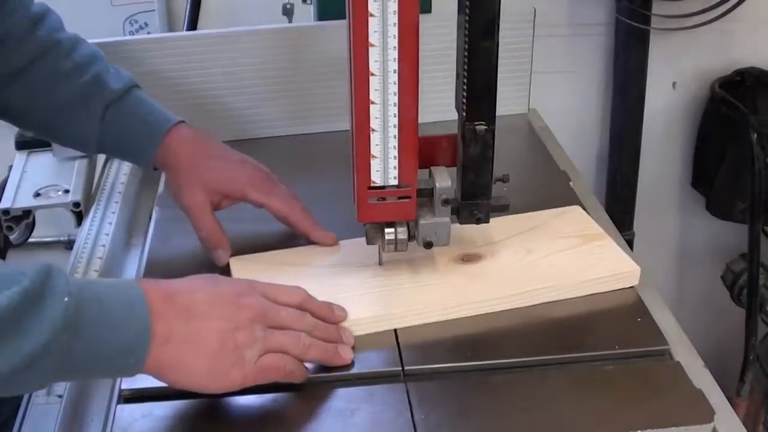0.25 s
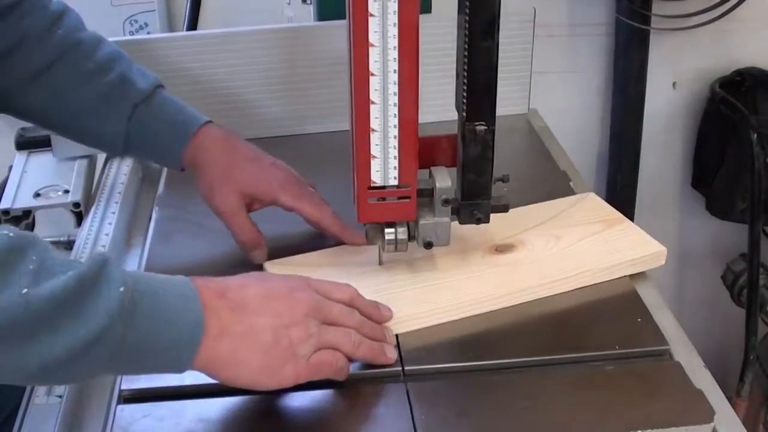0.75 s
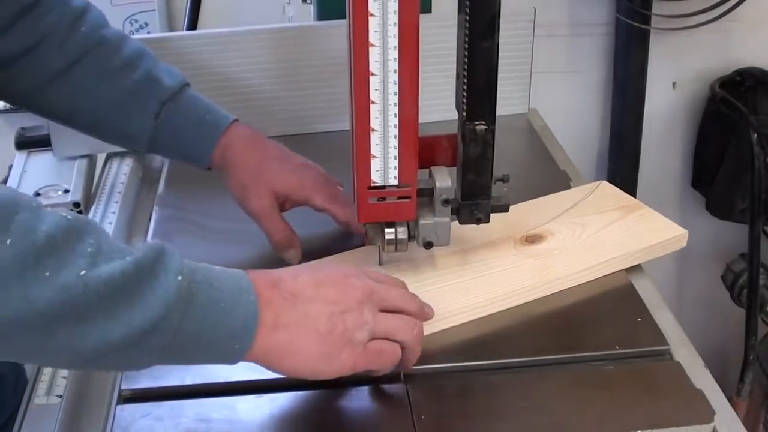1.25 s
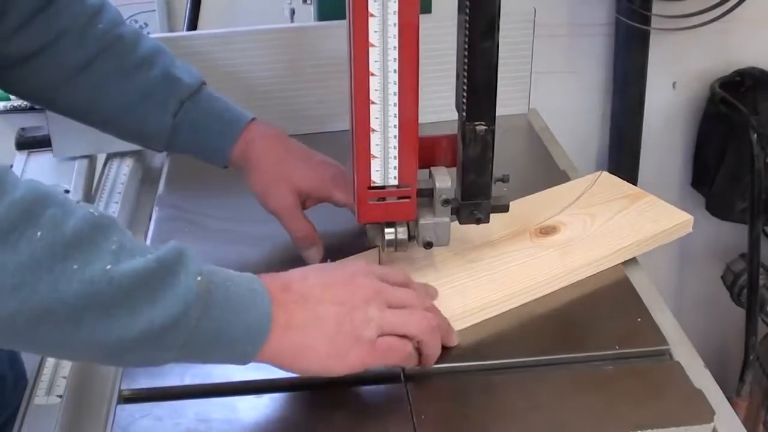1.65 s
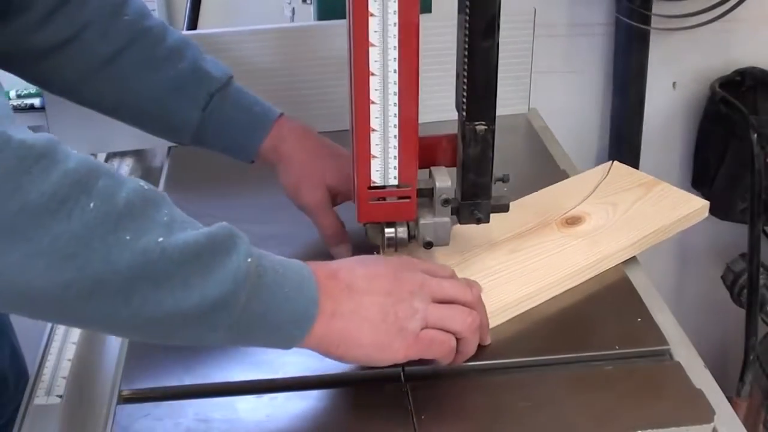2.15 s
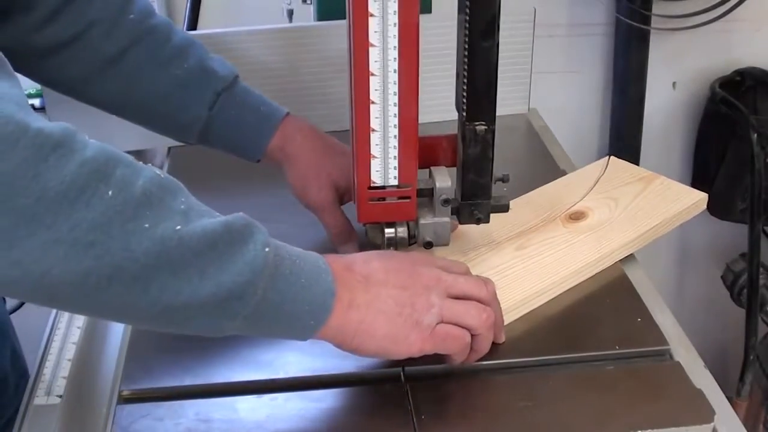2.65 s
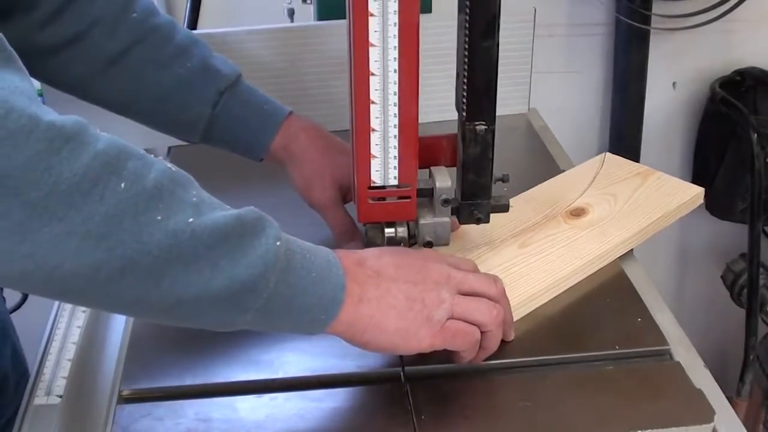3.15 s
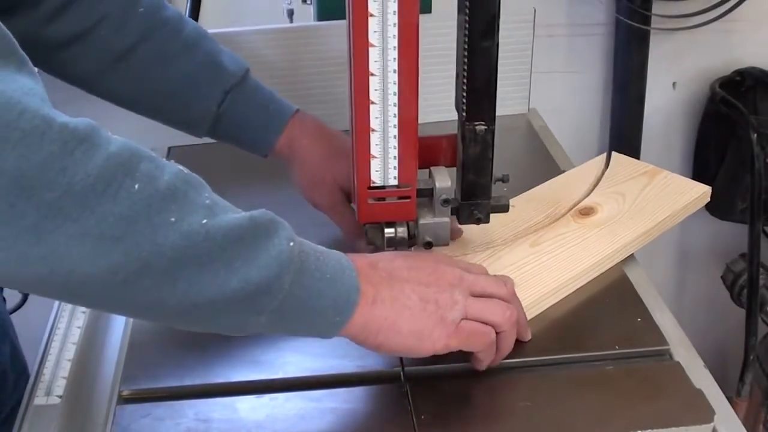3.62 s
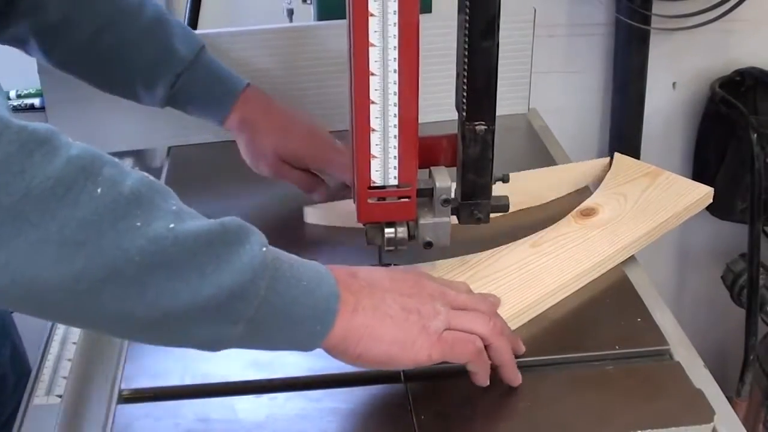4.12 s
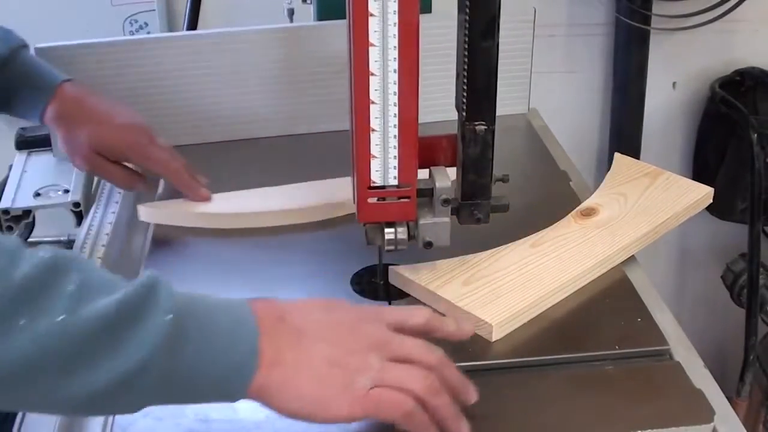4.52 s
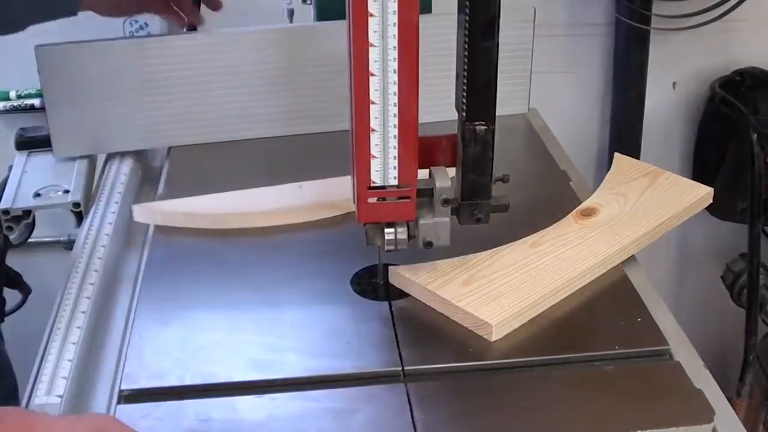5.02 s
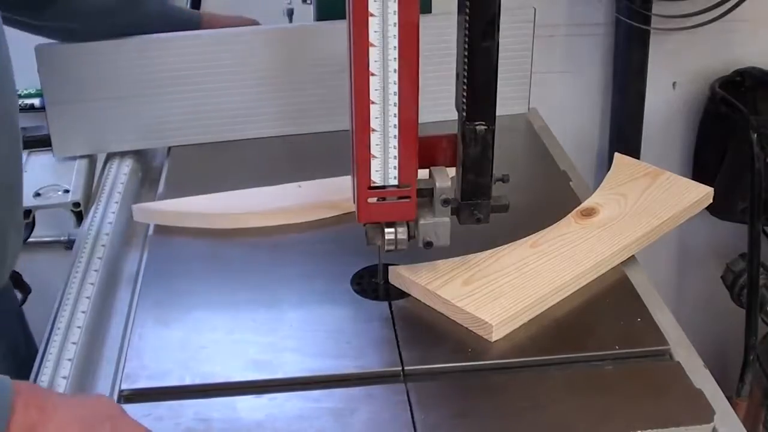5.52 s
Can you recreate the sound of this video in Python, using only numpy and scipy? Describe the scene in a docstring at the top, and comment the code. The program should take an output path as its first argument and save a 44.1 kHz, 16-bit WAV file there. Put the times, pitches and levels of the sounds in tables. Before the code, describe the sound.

Bandsaw cutting a pine board: fast thin whine, sudden change to harsh hissing rasp, then deeper free-running hum and a switch-off clunk.

```python
"""A bandsaw cuts a curve through a pine board in a workshop: motor partials over bands of resonant noise.
The first 2.3 s race by at about five times speed, so the motor's hum is a whine; then, at normal pace, the
teeth rasp through the last of the wood and the blade runs free. Narrow noise bands sing, a frame panel rings
in rough tones and short bursts scuff. Near the end the motor is switched off with a clunk of decaying modes:
its hum starts to die while the blade coasts on, still hissing. Dense reflections spread the sound a little."""
import sys
import numpy as np
from scipy import signal
from scipy.fft import rfft, irfft, next_fast_len
from scipy.io import wavfile

SR = 44100
rng = np.random.default_rng(int(sys.argv[2]) if len(sys.argv) > 2 else 0)


def bounce(signal):
    """Save signal as a 16-bit WAV file at the path given by the first command-line argument."""
    frames = np.transpose(np.atleast_2d(signal))
    limited = np.clip(frames, -1, 1)
    pcm = np.round(limited * 32767).astype(np.int16)
    wavfile.write(sys.argv[1], SR, pcm)


N = 254451
TIME = np.arange(N) / SR
BINS = np.maximum(np.arange(N // 2 + 1) * SR / N, 1)   # spectrum frequencies in Hz, never zero

# Motor partials, racing and at normal pace; level relative to the motor's: multiple of the pull, level_db
FAST_MOTOR_PARTIALS = [(1, -26), (2, -19.5), (3, -21), (4, 1), (5, -1.5), (6, -25.5), (8, -18)]
MOTOR_PARTIALS = [(1, -24), (2, -24), (3, -23), (4, 1.9), (5, -0.5), (6, -31.5), (8, -18.5), (9, -23.5)]
# Broad spectra; their noise is scaled to unit rms, so levels are relative: frequency_hz, level_db
FAST_SAW_SPECTRUM = [(30, -88.6), (150, -89.5), (400, -87.2), (650, -80), (950, -80.5), (1900, -69.5),
                     (3000, -75), (4200, -79), (6300, -81.5), (9500, -70), (11000, -76), (13000, -70.5),
                     (15600, -80)]
FRAME_SPECTRUM = [(25, -84), (90, -78.5), (200, -74), (260, -65.5), (400, -62), (600, -54.5), (800, -63),
                  (900, -62)]
CUTTING_SPECTRUM = [(850, -63.5), (1300, -61), (2300, -60.5), (4500, -59), (6000, -65.5), (7500, -58.5),
                    (10000, -61.5), (11000, -69.5), (13300, -69), (14000, -77), (15600, -77)]
FREE_BLADE_SPECTRUM = [(850, -61), (1900, -63.5), (2600, -66), (3800, -66.5), (4900, -57), (6100, -64.5),
                       (7200, -61), (8800, -57), (10500, -62), (11200, -68.5), (13200, -72.5), (14000, -73),
                       (15600, -86)]
SHUDDER_SPECTRUM = [(40, -36), (100, -19), (200, -3), (600, 2), (900, -12.5), (1900, -15), (3000, -18),
                    (8000, -34)]
# Resonances standing on those spectra, width at half gain: centre_hz, width_hz, level_db (relative)
FAST_SAW_RESONANCES = [(729, 57, -68), (1175, 37, -56), (1602, 148, -59), (2497, 140, -60),
                       (3276, 320, -60), (5056, 116, -69), (7530, 130, -68.5), (8870, 220, -64),
                       (9980, 620, -65.5), (15840, 900, -68)]
FRAME_RESONANCES = [(152, 30, -62.5), (245.2, 21.4, -51.5), (270, 6.1, -48), (295, 5.1, -47.5),
                    (303, 52, -53.5), (501.7, 26, -44.5), (617.7, 8.5, -46.5), (666.5, 2.3, -41.5)]
CUTTING_RESONANCES = [(1363, 22, -51), (1810, 140, -55.5), (2015, 80, -49), (2255, 80, -50),
                      (2530, 250, -52.5), (2727, 34, -48), (3410, 40, -45.5), (5455, 44, -49),
                      (6550, 280, -57), (6822, 50, -52), (10214, 80, -55), (13630, 120, -65)]
FREE_BLADE_RESONANCES = [(1770, 180, -59.5), (2015, 31, -53), (2460, 46, -61.5), (3270, 350, -60.5),
                         (3635, 13, -53.5), (5500, 17, -48.5), (6990, 320, -58), (12020, 130, -57),
                         (12700, 900, -64)]
# The blade sings in the kerf or on its guides: start_s, end_s, start_hz, end_hz, width_hz, level_db
SINGING_GLIDES = [(-.1, 0.929, 9400, 8590, 795, -27.5), (.58, 1.008, 15200, 15200, 500, -31),
                  (.8, 1.298, 13950, 13060, 1500, -26.5), (1.234, 1.562, 13360, 12800, 970, -23),
                  (1.615, 1.8, 12900, 12600, 800, -30), (1.95, 2.36, 12850, 12100, 1800, -28.5),
                  (1.975, 2.333, 7700, 6800, 800, -30), (2.465, 2.58, 6850, 6830, 110, -27),
                  (2.816, 3.381, 6720, 6600, 200, -28), (3.6, 4.506, 8300, 8500, 600, -27.5)]
# Teeth catch in hard grain or wood slides over the table: start_s, end_s, centre_hz, width_hz, level_db
SCUFF_BURSTS = [(0.143, 0.25, 9000, 2800, -23), (0.668, 0.697, 9200, 1390, -22),
                (1.36, 1.762, 5100, 600, -37), (2.872, 2.91, 1440, 700, -23),
                (3.052, 3.294, 2750, 600, -27), (4.052, 4.21, 1710, 600, -27.5),
                (4.175, 4.44, 1800, 900, -30)]
# A panel of the frame rings: start_s, end_s, pitch_hz, level_db
PANEL_TONES = [(.2, 0.573, 2553, -27.5), (1.52, 1.775, 2508, -24.5)]
# Low modes of the cabinet, struck by the switch: frequency_hz, level_db, t60_s
CABINET_RINGING = [(146.6, -19, 0.47), (265.7, -20, .45), (577, -15.5, 0.44)]
# Reflections, side against mid; frequencies at normal pace: frequency_hz, level_db
SIDE_SPECTRUM = [(60, -36), (130, -22), (290, -40), (640, -28), (1410, -22.5), (2600, -18.5), (5000, -16.5),
                 (8000, -26), (15000, -76)]
# How hard the board is fed through the curve: time_s, feed (0 to 1)
FEED_CURVE = [(0, 0.26), (.5, 0), (1.55, 1), (2.28, 0.86)]

# Moments in s: normal pace begins, the teeth leave the wood, the motor is switched off
NORMAL_PACE_S, EXIT_S, EXIT_LENGTH_S, SWITCH_S = 2.297, 3.41, 0.11, 5.604
FAST_SPEED, NORMAL_SPEED = 4.973, 1
# Rates at normal pace: the magnetic pull, turns of the guide bearing, turns of the blade loop
PULL_HZ, GUIDE_HZ, BLADE_LOOP_HZ = 119.93, 77.7, 2.4

# Parts of the racing saw: (dB at the lightest feed, dB gained at full feed)
FAST_WHINE = (-28.4, 5.85)
FAST_FRAME = (-39, 5.14)
FAST_PANELS = (-32, 4.1)
FAST_RASP = (-38, 4.7)
FAST_HISS = (-27.5, 0.93)
# As the curve tightens the blade rubs the side of the kerf ever harder
BIND_S, BIND_RASP_DB_PER_S, BIND_HISS_DB_PER_S = 1.03, 5, 2.6

# At normal pace, in the wood and running free
HUM_CUTTING_DB, HUM_FREE_DB = -25.5, -20.5
RASP_CUTTING_DB, RASP_FREE_DB = -20, -29
HISS_CUTTING_DB, HISS_FREE_DB = -18, -19.5   # free hiss as the teeth leave the wood
FRAME_CUTTING_DB, FRAME_FREE_DB = -27.5, -26
CLEARING_DB_PER_S = 0.82   # the free blade hisses more as the wood is drawn away from it
HUM_T60_S = .55            # decay of hum and rumble once the current is cut

PANEL_OCTAVE_DB = -16      # second partial against the first
DRONE_S, DRONE_HZ, DRONE_WIDTH_HZ, DRONE_DB = 5.2, 261, 10, -30
SHUDDER_DB, SHUDDER_T60_S = -16, 1.2
REBOUND_S, REBOUND_DB = .102, -6.5   # the cabinet rattles once more, after this delay
SHOP_T60_S = 0.05          # at normal pace
CUTOFF_HZ = 15700


def from_db(db):
    """Amplitude gain is ten to the power of decibels over twenty."""
    return 10 ** (np.asarray(db) / 20)


def rms_one(x):
    """Normalisation divides a signal by the root of its mean power."""
    return x / np.sqrt(np.mean(x ** 2) + 1e-20)


def noise(gain):
    """Filtering white noise by a gain over frequency gives steady coloured noise, here of rms 1."""
    size = next_fast_len(N, real=True)
    shape = np.interp(np.arange(size // 2 + 1) * SR / size, BINS, gain)
    white = rfft(rng.standard_normal(size))
    return rms_one(irfft(white * shape, size)[:N])


def drift(rate_hz):
    """Low-passed noise is a slow random fluctuation, here of rms 1."""
    return noise(1 / (1 + (BINS / rate_hz) ** 2))


def peak(centre_hz, width_hz):
    """A resonance responds most at its centre and with half the gain at the edges of its width."""
    return 1 / (1 + (2 * (BINS - centre_hz) / width_hz) ** 2)


def body(spectrum, resonances=(), ripple=1):
    """Powers add: resonances stand on a broad, possibly rippled spectrum; returns gain."""
    hz, db = np.transpose(spectrum)
    broad_db = np.interp(np.log(BINS), np.log(hz), db)
    power = (ripple * from_db(broad_db)) ** 2
    for centre_hz, width_hz, peak_db in resonances:
        power = power + (from_db(peak_db) * peak(centre_hz, width_hz)) ** 2
    return np.sqrt(power)


def band(low_hz, high_hz, order=16):
    """A high-pass and a low-pass skirt together form a steep band-pass gain."""
    return ((1 + (low_hz / BINS) ** order) * (1 + (BINS / high_hz) ** order)) ** -.5


def fine_modes(spacing_hz, ripple_db):
    """Modal overlap: many modes of blade, table and guards ripple the response, less so in the treble."""
    grid = np.arange(0, SR / 2, spacing_hz)
    heights = np.clip(rng.standard_normal(len(grid)), -2, 2)
    ripple = np.interp(BINS, grid, heights)
    return from_db(ripple_db * ripple / (1 + BINS / SR * 2))


def swell(start, end):
    """A half-sine power envelope rises and falls roundly between two times."""
    progress = np.clip((TIME - start) / (end - start), 0, 1)
    return np.sqrt(np.abs(np.sin(np.pi * progress)))


def dying(start, t60):
    """Damping is exponential decay: 1 until start, then 60 dB lost per t60."""
    return from_db(-60 * np.maximum(TIME - start, 0) / t60)


def resonance(start, end, start_hz, end_hz, width_hz, db):
    """An unevenly driven resonance is a carrier with random quadrature amplitudes; it swells and may glide."""
    pitch_hz = np.interp(TIME, [start, end], [start_hz, end_hz])
    phase = 2 * np.pi * np.cumsum(pitch_hz) / SR
    ringing = drift(width_hz / 2) * np.cos(phase) + drift(width_hz / 2) * np.sin(phase)
    return from_db(db) * swell(start, end) * ringing


def motor(level_db, partials, speed, shake_db, shake_hz, wobble):
    """Magnetic pull forces the cabinet at its harmonics, each fluttering a little with the belt."""
    phase = 2 * np.pi * PULL_HZ * speed * TIME
    out = 0
    for multiple, db in partials:
        wander = wobble * drift(shake_hz * speed)   # radians
        angle = round(multiple) * phase + rng.uniform(0, 2 * np.pi) + wander
        out = out + from_db(db + shake_db * drift(shake_hz * speed)) * np.sin(angle)
    return np.sqrt(2) * from_db(level_db) * out


def guide_chatter(speed, depth, sharpness, loop_db, rough_db):
    """Amplitude modulation: the blade presses on its guide once a bearing turn, and swings once a loop."""
    turns = GUIDE_HZ * speed * (TIME + 0.0011 * drift(0.8))   # timing wanders by about a millisecond
    bumps = np.exp(sharpness * np.cos(2 * np.pi * turns))
    pressing = 1 + depth * rms_one(bumps - bumps.mean())
    swing_db = loop_db * np.sin(2 * np.pi * BLADE_LOOP_HZ * speed * TIME)
    return rms_one(pressing * from_db(swing_db + rough_db * drift(40 * speed)))


def racing_saw():
    """Speeding up multiplies frequencies: hum becomes whine, the cut a thin hiss; all grow with the feed."""
    feed = np.interp(TIME, *np.transpose(FEED_CURVE))
    whine_db, frame_db, panel_db, rasp_db, hiss_db = [
        light_db + gained_db * feed
        for light_db, gained_db in (FAST_WHINE, FAST_FRAME, FAST_PANELS, FAST_RASP, FAST_HISS)]
    binding_s = np.maximum(TIME - BIND_S, 0)
    rasp_db = rasp_db + BIND_RASP_DB_PER_S * binding_s
    hiss_db = hiss_db + BIND_HISS_DB_PER_S * binding_s

    colour = body(FAST_SAW_SPECTRUM, FAST_SAW_RESONANCES)
    ringing = colour * fine_modes(spacing_hz=45, ripple_db=2.8)
    frame = from_db(frame_db) * noise(colour * band(16, 1740))
    panels = from_db(panel_db) * noise(colour * band(2340, 2820))
    rasp = from_db(rasp_db) * noise(ringing * band(3800, 7070))
    hiss = from_db(hiss_db) * noise(ringing * band(6000, 19500))
    chatter = guide_chatter(FAST_SPEED, depth=0.046, sharpness=1.5, loop_db=1.04, rough_db=1.56)
    whine = motor(whine_db, FAST_MOTOR_PARTIALS, FAST_SPEED, shake_db=1.18, shake_hz=3.6, wobble=0.034)
    return whine + frame + panels + (rasp + hiss) * chatter


def singing_blade():
    """Friction keeps narrow resonances of the blade ringing; most slide in pitch as the board turns."""
    return sum(resonance(*row) for row in SINGING_GLIDES)


def workshop(x, speed):
    """Dense reflections decay as noise; speeding up shortens them and shifts their colour upward."""
    echoes = rng.standard_normal(SR // 2) * dying(0, SHOP_T60_S / speed)[:SR // 2]
    wet = signal.fftconvolve(x, echoes / np.sqrt(np.sum(echoes ** 2)))[:N]
    colour = body([(hz * speed, db) for hz, db in SIDE_SPECTRUM])
    return irfft(rfft(wet) * colour, N)


def scuffs():
    """Sliding friction is noise: brief swells of it are heard through one broad resonance each."""
    return sum(from_db(db) * swell(start, end) * noise(peak(centre_hz, width_hz))
               for start, end, centre_hz, width_hz, db in SCUFF_BURSTS)


def ringing_panel(wander_hz, flutter_hz, rough_db):
    """Forced resonance: a panel driven by the blade rings as one rough tone with a faint octave."""
    out = 0
    for start, end, pitch_hz, db in PANEL_TONES:
        phase = 2 * np.pi * np.cumsum(pitch_hz + wander_hz * drift(flutter_hz)) / SR
        tone = np.sin(phase) + from_db(PANEL_OCTAVE_DB) * np.sin(2 * phase)
        level = np.sqrt(2) * from_db(db + rough_db * drift(flutter_hz))
        out = out + level * swell(start, end) * tone
    return out


def tearing_fibres(cutting):
    """Fracture is irregular: fibres give way unevenly, each band of about half an octave surging on its own."""
    edges = np.geomspace(850, 3800, 5)   # Hz
    out = 0
    for low_hz, high_hz in zip(edges, edges[1:]):
        part = cutting * band(low_hz, high_hz)
        out = out + np.linalg.norm(part) * noise(part) * from_db(0.72 * drift(7.7))
    return rms_one(out)


def saw():
    """Damping and excitation shift as the teeth leave the wood: rasp gives way to hiss, hum and rumble rise."""
    bite = .5 - .5 * np.tanh(2 * (TIME - EXIT_S) / EXIT_LENGTH_S)   # 1 in the wood, 0 running free
    ringing = fine_modes(spacing_hz=19, ripple_db=3.2)
    cutting = body(CUTTING_SPECTRUM, CUTTING_RESONANCES, ringing)
    free = body(FREE_BLADE_SPECTRUM, FREE_BLADE_RESONANCES, ringing)
    # Square roots make the crossfade equal in power
    in_wood = np.sqrt(bite) * guide_chatter(
        NORMAL_SPEED, depth=0.023, sharpness=1.7, loop_db=0.5, rough_db=0.7)
    in_air = np.sqrt(1 - bite) * guide_chatter(
        NORMAL_SPEED, depth=0.067, sharpness=6.2, loop_db=0.1, rough_db=0.92)

    rasp = from_db(RASP_CUTTING_DB) * in_wood * tearing_fibres(cutting)
    rasp = rasp + from_db(RASP_FREE_DB) * in_air * noise(free * band(866, 3880))
    high = band(3750, 18000)
    free_db = HISS_FREE_DB + CLEARING_DB_PER_S * (TIME - EXIT_S)
    hiss = from_db(HISS_CUTTING_DB) * in_wood * noise(cutting * high)
    hiss = hiss + from_db(free_db) * in_air * noise(free * high)

    # The wood damps the machine: hum and rumble come up once the cut is free
    frame_db = bite * FRAME_CUTTING_DB + (1 - bite) * FRAME_FREE_DB
    hum_db = bite * HUM_CUTTING_DB + (1 - bite) * HUM_FREE_DB
    frame = from_db(frame_db) * noise(body(FRAME_SPECTRUM, FRAME_RESONANCES) * band(15, 900))
    hum = motor(hum_db, MOTOR_PARTIALS, NORMAL_SPEED, shake_db=0.8, shake_hz=5.1, wobble=0.053)
    return rasp + hiss + (hum + frame) * dying(SWITCH_S, HUM_T60_S)


def cabinet_drone():
    """Modal resonance: with the blade free, a low cabinet mode swells and fades out by the switch-off."""
    return resonance(DRONE_S, SWITCH_S, DRONE_HZ, DRONE_HZ, DRONE_WIDTH_HZ, DRONE_DB)


def switch_off():
    """Impact excites damped modes: low cabinet modes build up and ring while its sheet metal shudders."""
    out = 0
    for start, gain in (SWITCH_S, 1), (SWITCH_S + REBOUND_S, from_db(REBOUND_DB)):
        age = np.maximum(TIME - start, 0)
        shudder = from_db(SHUDDER_DB) * dying(start, SHUDDER_T60_S) * noise(body(SHUDDER_SPECTRUM))
        ring = sum(from_db(db) * dying(start, t60) * np.sin(2 * np.pi * hz * age)
                   for hz, db, t60 in CABINET_RINGING)
        # Both build up over several milliseconds
        out = out + gain * (np.clip(age / 0.0075, 0, 1) * shudder + np.clip(age / 0.014, 0, 1) * ring)
    return out


def scene():
    """Mid and side superpose: one machine straight ahead, and only reflections differ between the ears."""
    normal = np.clip((TIME - NORMAL_PACE_S) / .003, 0, 1)   # 0 while racing, 1 at normal pace
    panel = ringing_panel(wander_hz=21.9, flutter_hz=45, rough_db=1.5)
    machine = (1 - normal) * racing_saw() + normal * saw()
    mid = machine + singing_blade() + panel + scuffs() + cabinet_drone() + switch_off()
    side = workshop((1 - normal) * mid, FAST_SPEED) + workshop(normal * mid, NORMAL_SPEED)
    return np.array([mid + side, mid - side])


def record(dry):
    """An elliptic low-pass cuts the top steeply."""
    low_pass = signal.ellip(12, .2, 80, CUTOFF_HZ, fs=SR, output="sos")   # .2 dB ripple, 80 dB rejection
    return signal.sosfilt(low_pass, dry)


dry = scene()
out = record(dry)
bounce(out)
```